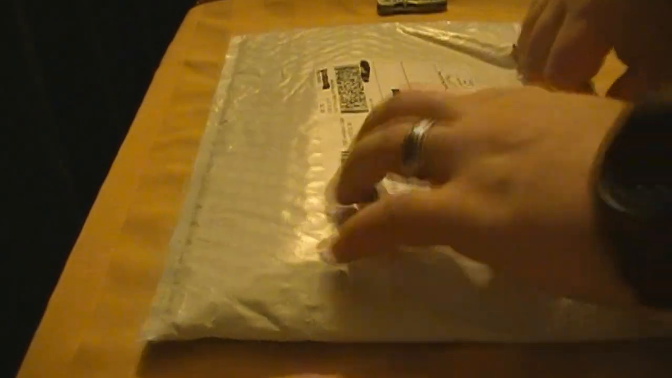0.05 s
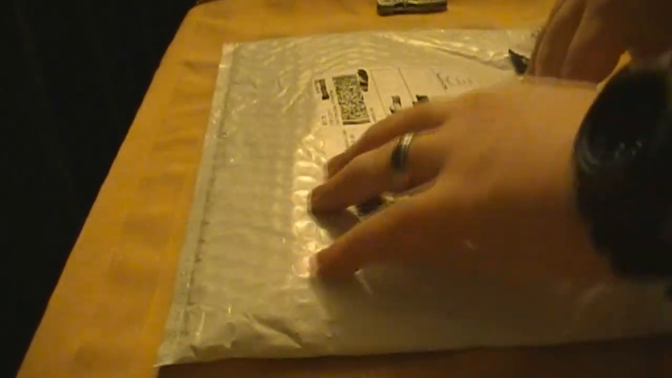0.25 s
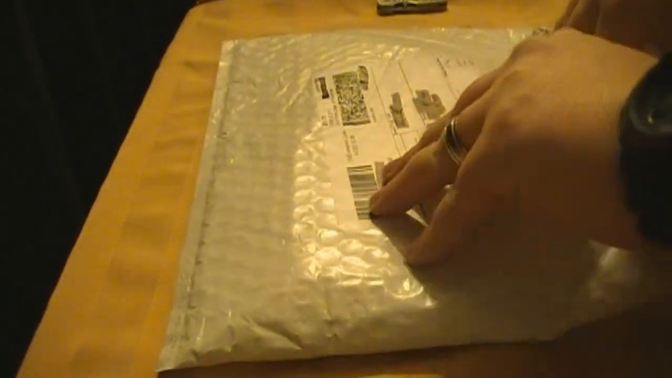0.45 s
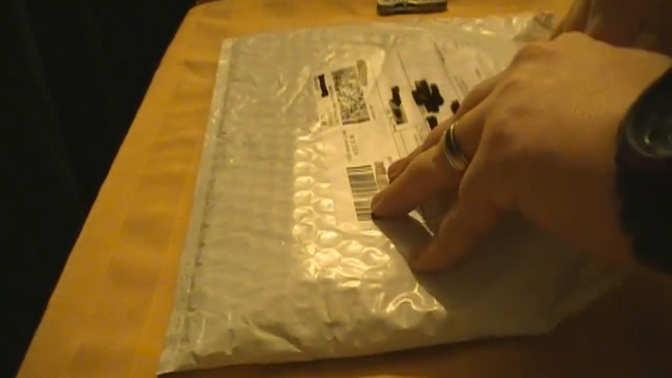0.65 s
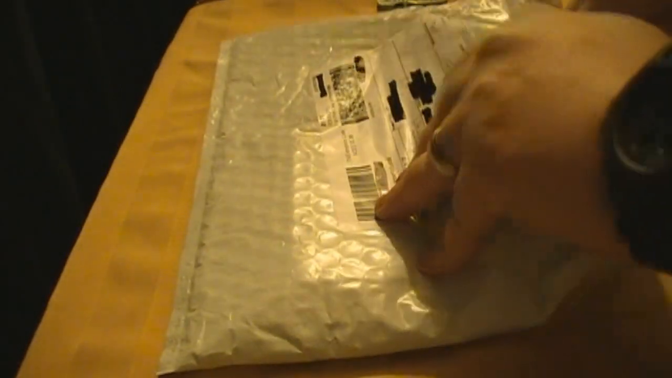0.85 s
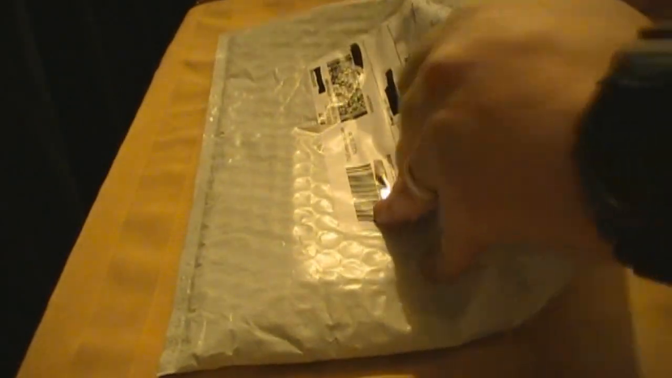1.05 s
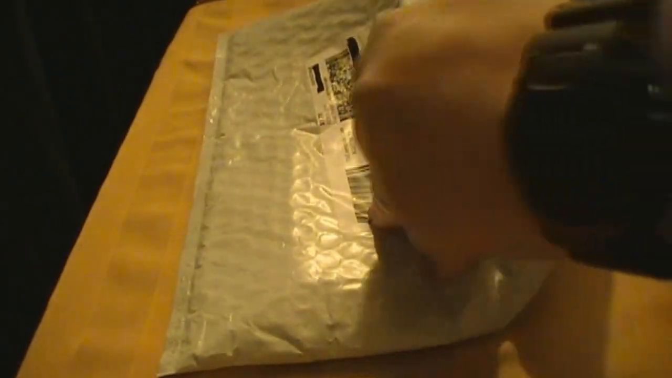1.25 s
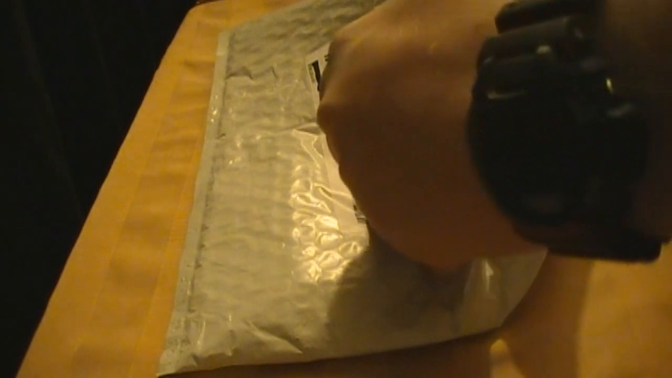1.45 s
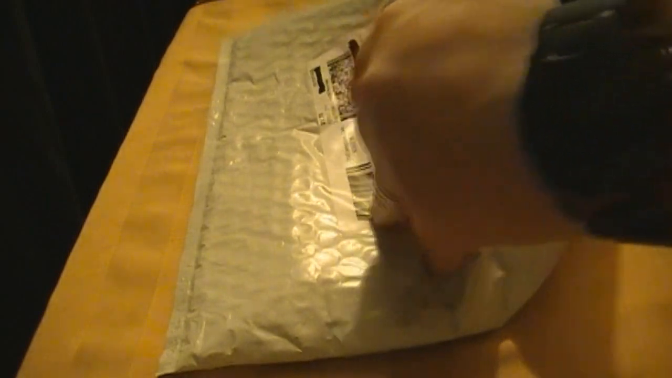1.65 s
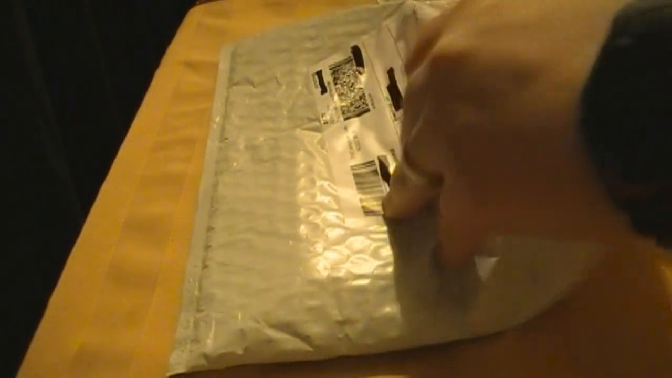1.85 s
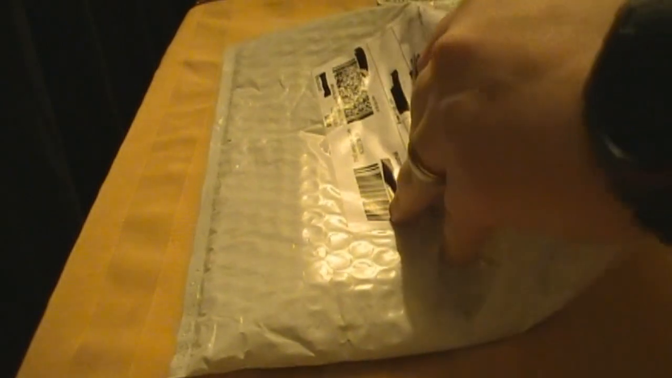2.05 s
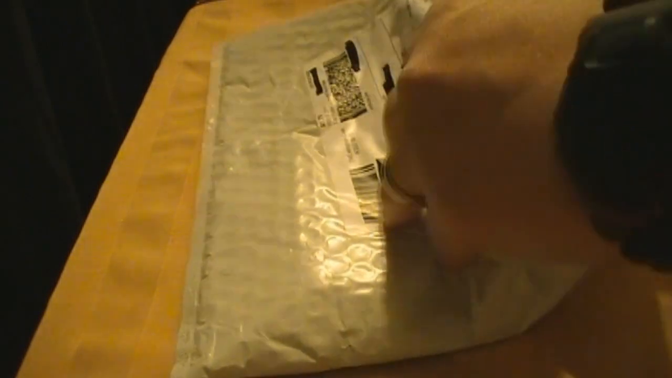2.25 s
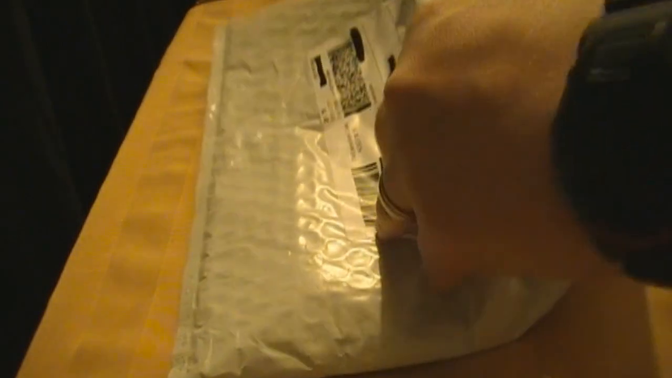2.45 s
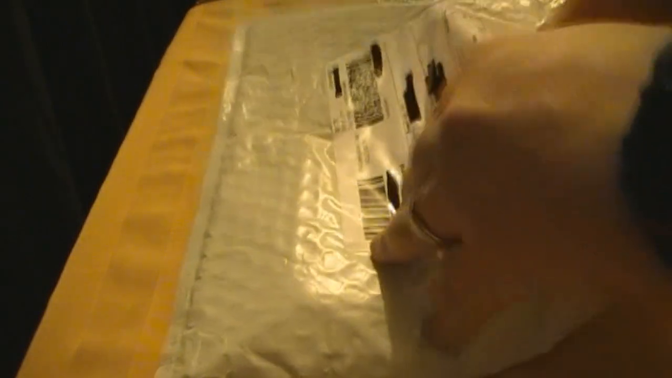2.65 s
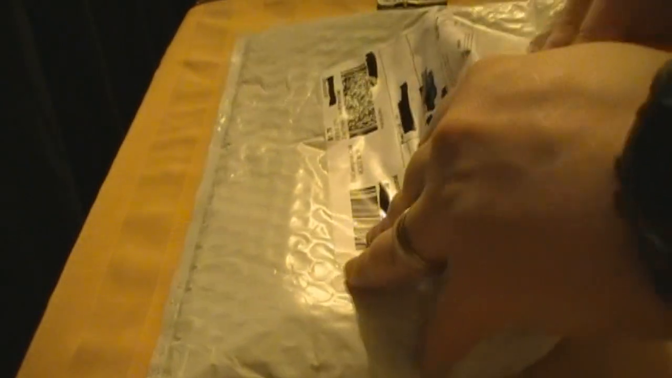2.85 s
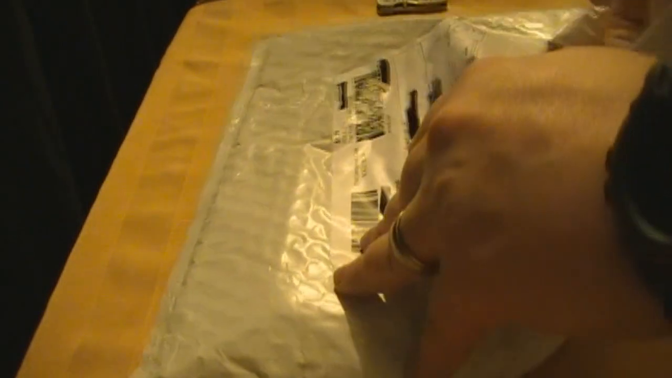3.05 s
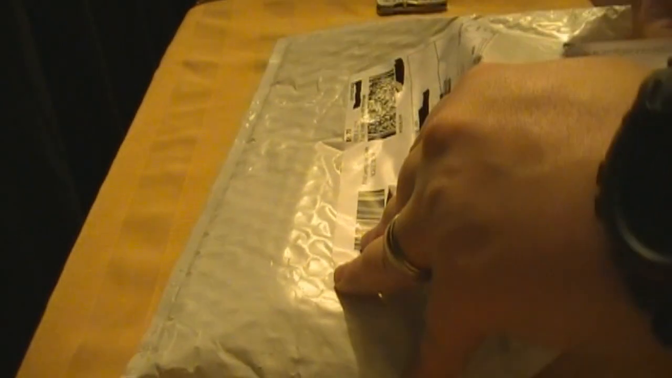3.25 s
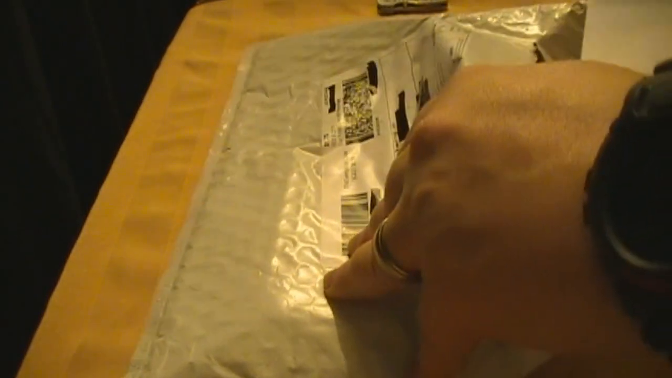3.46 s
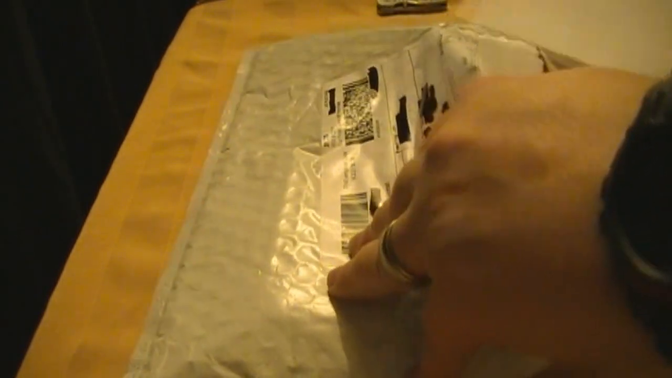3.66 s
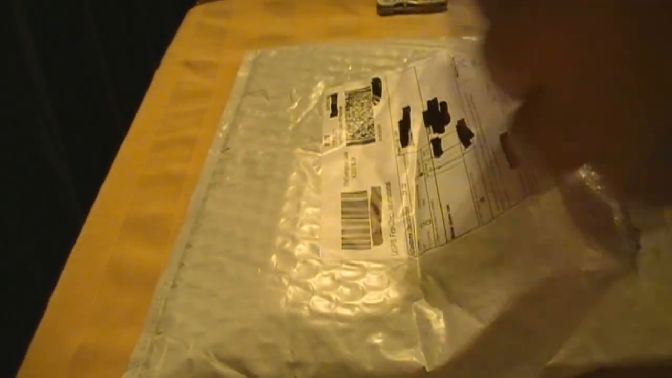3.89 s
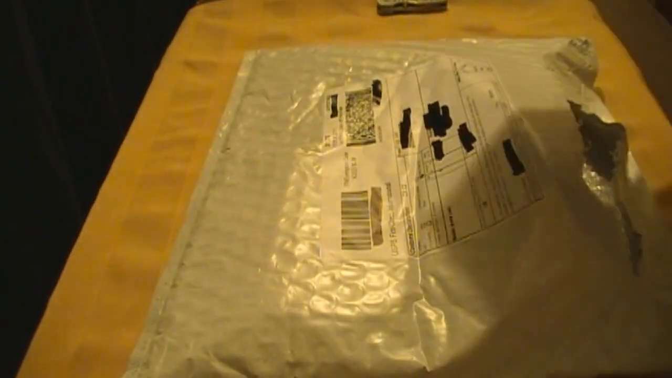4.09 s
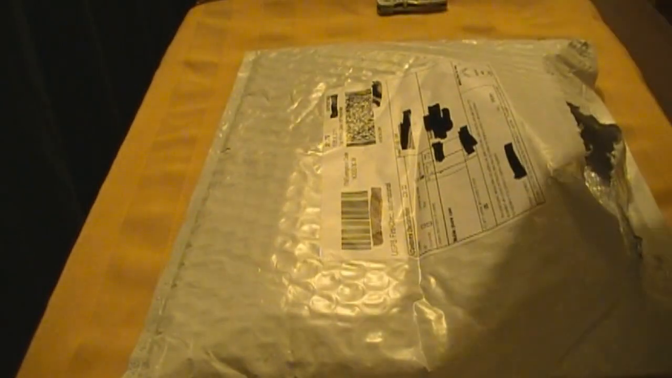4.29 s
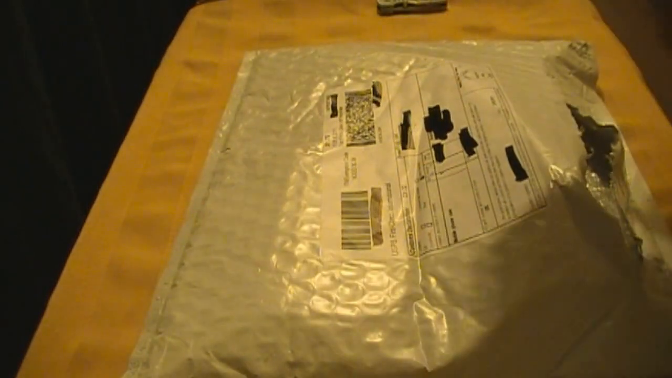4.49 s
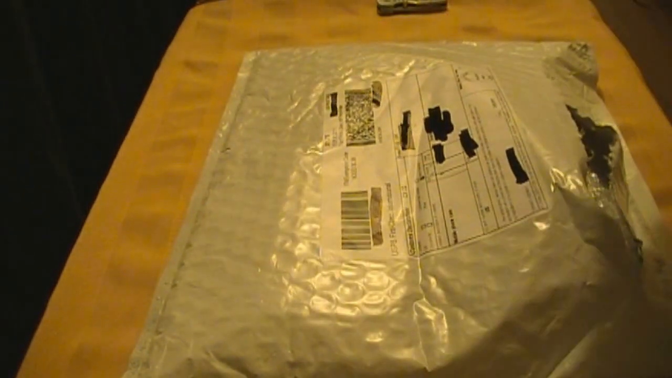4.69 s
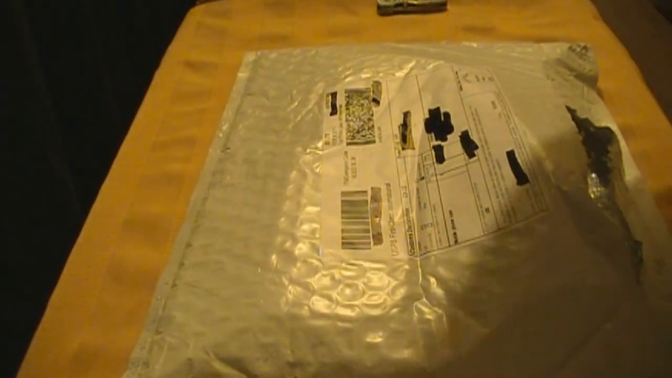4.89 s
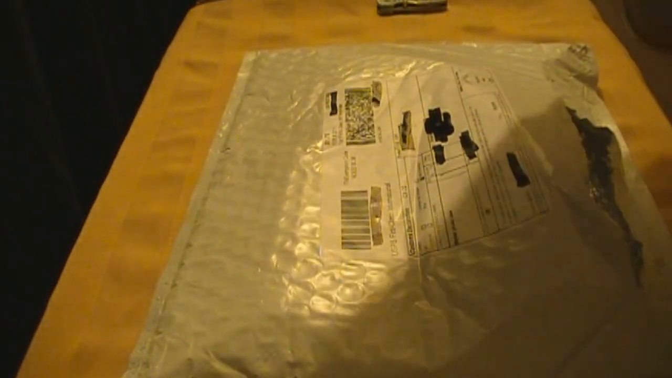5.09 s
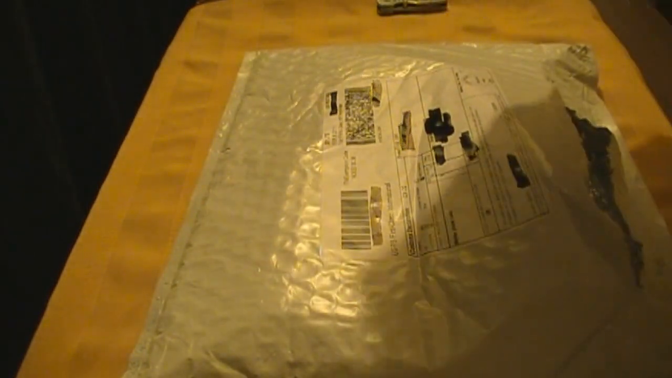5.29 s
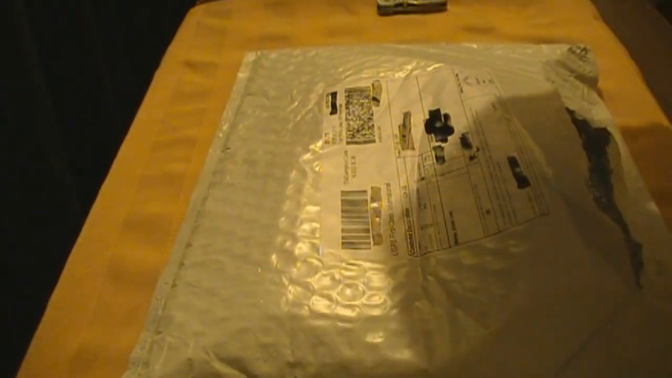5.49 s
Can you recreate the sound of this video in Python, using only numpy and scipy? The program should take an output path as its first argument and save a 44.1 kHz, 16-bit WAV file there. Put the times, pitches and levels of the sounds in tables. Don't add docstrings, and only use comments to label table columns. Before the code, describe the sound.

Close, bright crackle of a padded plastic envelope being torn and squeezed, with dull table thumps, then faint small ticks over hiss.

```python
import sys
import numpy as np
from scipy import signal
from scipy.fft import rfft, irfft, next_fast_len
from scipy.io import wavfile
from scipy.ndimage import uniform_filter1d

SR = 44100
rng = np.random.default_rng(int(sys.argv[2]) if len(sys.argv) > 2 else 0)


def level_to_linear(level):
    exponent = np.asarray(level, float) / 20
    return 10 ** exponent


def store_wav(level_fs):
    pcm = np.round(np.clip(np.atleast_2d(level_fs), -1, 1) * 32767)
    wavfile.write(sys.argv[1], SR, pcm.T.astype(np.int16))


N = 243991

# start in seconds, film crack energy in dB, padding knock energy in dB, panel pitch in Hz.
CREASES = [(.0348, -15, -38, 2230), (.0758, -40, -15.5, 1700), (.1041, -13, -14, 1310),
           (.1413, -5.5, -28, 1410), (.1563, -11, -29, 1810), (.2639, -31, -8, 2000),
           (.28, -12, -33, 1840), (.2958, -29, -11, 1340), (.3506, -11, -16, 2010),
           (.362, -6, -12.5, 1400), (.3789, -4, -16, 1920), (.3899, -11, -8, 1790),
           (.4127, -15, -7.5, 1340), (.4262, -23, -6.5, 2270), (.4433, -1, -2.5, 2120),
           (.4507, -2.5, -10, 1320), (.488, -29, -19, 1230), (.497, 2, -19, 1350), (.501, -35, -16, 930),
           (.5809, -31, -16.5, 1300), (.5914, -28, -12, 1920), (.6454, -6.5, -15.5, 1500),
           (.6634, -13, -41, 1800), (.672, -11, -45, 2130), (.6793, -25, -14.5, 1210),
           (.6929, -22, -15, 1420), (.7088, -7, -17, 1670), (.7316, 1, -14.5, 1860),
           (.7564, -22, -15, 2030), (.7853, -19, -23, 410),
           (0.7932, 1.5, -5.5, 1900), (0.8145, -13, -17, 2200), (0.8666, -11, -46, 2300),
           (0.9381, -16, -42.5, 970), (0.9436, -38, -10, 616), (0.977, -4, -24, 1990),
           (0.98, -28, -13.5, 1460), (1.0147, -21, -7, 1380), (1.0341, -9, -27, 750),
           (1.118, -6.5, -6.5, 402), (1.1443, -1.5, -23, 1500), (1.154, -9, -29, 1590),
           (1.1595, -18, -11, 2920), (1.203, 1, -11.5, 666), (1.298, -35, -32, 1750),
           (1.3101, -7.5, -21, 1820), (1.3184, -42, 2, 1470), (1.3256, 0.5, -43, 1710),
           (1.332, -8.5, -42, 2330), (1.425, -16, -13.5, 1780), (1.485, -9.5, -31, 1520),
           (1.5858, -7, -8, 1380), (1.6622, -34, -16.5, 720), (1.6792, -11, -9, 1940),
           (1.755, -11, -12.5, 1340), (1.7705, -10.5, -8.5, 2050), (1.8442, -38, -6, 2180),
           (1.8773, -9.5, -21, 710), (1.9319, -10.5, -43, 760), (2.055, -16, -6.5, 1880),
           (2.1664, -9, -4.5, 1800), (2.2561, -28, -9, 1020), (2.2631, -7.5, 0.5, 1590),
           (2.3414, -21, -3.5, 1560), (2.354, 0, -24, 1200), (2.4494, 1.5, 0, 664),
           (2.4786, -0.5, -6, 2340), (2.495, -3, -9, 1540), (2.518, -5, -7.5, 960), (2.5934, 0.5, 0.5, 655),
           (2.601, -12, -9, 1820), (2.6056, 3, -9.5, 990), (2.6242, 2.5, -1.5, 1400),
           (2.6697, -15, -8, 1402), (2.674, -1, -2.5, 1370), (2.7, -40, -8.5, 1390), (2.7985, 3, -3, 1390),
           (2.819, -17, -9, 1530), (2.908, -10.5, -21, 2180), (2.935, -17, -15, 1810),
           (2.981, -8, -12, 714), (2.986, -4, -5, 680), (3.008, -18, -6.5, 870), (3.0362, -12, -20, 790),
           (3.1223, -13, -7, 1580), (3.1990, 0, -4, 1470), (3.2053, 5, -4, 2010), (3.3178, -20, -12, 1580),
           (3.3446, -3.5, -6.5, 1220), (3.348, -4, -9, 398),
           (3.3578, -7, -3.5, 366), (3.37, -2, -2, 1730), (3.373, -6, -1, 3180), (3.379, -9, -1.5, 1940),
             (3.4621, 2, -1, 1920), (3.4703, -12, -13, 940), (3.688, -14, -6.5, 477),
             (3.6952, -2.5, -15, 740), (3.7077, -8, -23, 1310), (3.7272, -18, -13.5, 1840),
             (3.7513, -28, -9.5, 1230), (3.756, -16, -20, 1180), (3.7918, -6.5, -9.5, 1330),
             (3.889, -30, -13, 1260), (3.933, -4.5, -6.5, 2890), (3.993, -19, -24, 1290),
             (4.0711, -5.5, -5.5, 1890), (4.0825, -10, -6.5, 2480), (4.113, -10, -13, 536),
             (4.139, -1.5, 0, 1840), (4.1468, -24, -4, 1890), (4.2038, -17, -5, 2280),
             (4.263, -29, -8, 1720), (4.269, -9, -7.5, 1270), (4.274, -5.5, -2.5, 1760),
             (4.3284, 3.5, -8, 2290), (4.3352, 4, -7.5, 1260), (4.3415, -1, -0.5, 3100),
             (4.3571, -14, -3.5, 1850), (4.3628, -11, -6, 1260),
           (.31, -6.5, -30, 1010), (1.378, -34, -13, 980), (1.52, -22, -38, 1510), (1.6548, -25, -13.5, 440),
         (3.569, -33, -19, 710), (3.8005, -6.5, -41.5, 510), (3.816, -35, -12.5, 1280),
         (4.1302, -12, -7, 2600), (4.255, -35, -18, 1690), (4.374, -34, -9.5, 1920),
         (3.5345, -32, -43, 1500), (4.4208, -44, -22.5, 1930), (4.447, -20, -50, 1630),
         (4.493, -37, -21, 587), (4.5522, -14.5, -32, 3130), (4.713, -25.5, -18.5, 1310),
         (4.7397, -12, -22, 1240), (4.7467, -25, -14.5, 1240), (4.9033, -22, -28, 2100),
         (4.9568, -18.5, -34, 2070), (5.0718, -16.5, -26.5, 2090), (5.27, -24, -44, 363),
         (5.288, -19, -46, 650), (5.352, -30, -45, 1160), (5.454, -25, -25, 1480),
         (5.4886, -15.5, -23, 2070), (5.329, -25, -34, 1160), (2.0515, -4.5, -7, 1680),
         (3.458, -21, -9, 1800), (0.791, -2, -4.5, 3120), (4.5498, -18, -32, 3200),
         (1.0125, -15, -36, 1500)]
# low edge in Hz, high edge in Hz, first decay in ms (size only), debris decay in ms (at least 1),
# debris share (size only), level trim in dB.
CRACK = (5980, 10450, 0.34, 2.37, 0.11, 0.064)
KNOCK = (980, 4200, 1.7, 14, 0.23, 0.037)
THUMP = (270, 956, 0.97, 4.7, 1.44, 0.057)
RASP = (3289, 5321, -1, 3, 7, -5.5)
LEAK_DB, LEAK_DB_PER_OCTAVE = -10, -3


def snaps():
    creases = sorted(CREASES)
    s, crack_db, knock_db, panel_hz = np.transpose(creases)
    crack = snap_part(s, crack_db, CRACK)
    crack = crack + level_to_linear(-2.0) * band(crack, 9270, 16000)
    rasp = snap_part(s, 0.5 * (crack_db + knock_db), RASP)
    knock = snap_part(s, knock_db, KNOCK, panel_hz)
    leak_db = knock_db + LEAK_DB + LEAK_DB_PER_OCTAVE * np.log2(panel_hz / 1000)
    leak = snap_part(s, leak_db, THUMP, panel_hz)
    return level_to_linear(-1.5) * crack + rasp + knock + leak


PANEL_Q, PANEL_DB = 6, 11.5
RING_DB_PER_DB = 0.34
PADDED = 2.45
LEAD_MS, LEAD_SHARE, GIVE_MS = 7.9, 0.041, 0.28
CROWD_MS, CROWD_GAIN = 5.9, 0.91
CRUSH_S, CRUSH_HALF_S, CRUSH_GAIN = 4.2, 0.19, 2.7


def snap_part(s, energy_db, part, panel_hz=None, panel_db=PANEL_DB):
    low_hz, high_hz, first_ms, debris_ms, share, trim_db = part
    before = 400
    ms = np.arange(-before, 1400) * 1000 / SR
    chance = rng.standard_normal((len(s), 2, len(ms)))
    chance[:, 0, before] = 3.5 * np.sign(chance[:, 0, before])
    uneven = chance[:, 1] ** 2

    gaps_ms = 1000 * np.diff(s, prepend=-1, append=9)
    nearest_ms = np.minimum(gaps_ms[1:], gaps_ms[:-1])[:, None]
    crowd = 1 + CROWD_GAIN * np.exp(-(nearest_ms / CROWD_MS) ** 2)
    crowd = crowd + CRUSH_GAIN * (abs(s - CRUSH_S) < CRUSH_HALF_S)[:, None]

    debris = crowd * abs(share) * uneven * np.exp(-ms / np.clip(debris_ms, 1, 20))
    lead = np.sqrt(crowd) * LEAD_SHARE * uneven * np.exp(ms / LEAD_MS)
    if panel_hz is not None:
        lead = 2 * lead + np.exp(-abs(ms / GIVE_MS))
    shape = np.where(ms < 0, lead, np.exp(-abs(ms / first_ms)) + debris)
    bursts = band(chance[:, 0] * shape, low_hz, high_hz)
    bursts = band(bursts, 0.68 * low_hz, 4.4 * high_hz)
    if panel_hz is not None:
        bursts = panel_ring(bursts, ms, energy_db, panel_hz, panel_db)

    norm = np.sqrt(np.sum(bursts ** 2, axis=1, keepdims=True))
    bursts *= level_to_linear(energy_db + trim_db)[:, None] / norm
    out = np.zeros(N + len(ms))
    for at, burst in zip(np.round(s * SR).astype(int), bursts):
        out[at:at + len(ms)] += burst
    return out[before:N + before]


def panel_ring(bursts, ms, energy_db, panel_hz, panel_db):
    ratio = (np.arange(len(ms) // 2 + 1) + 0.01) * SR / len(ms) / panel_hz[:, None]
    lines = rfft(bursts)
    slip = uniform_filter1d(abs(lines), size=41) * rfft(ms == 0)
    ring_db = panel_db + RING_DB_PER_DB * np.minimum(energy_db, 0)
    resonance = level_to_linear(ring_db)[:, None] / (1 + 1j * PANEL_Q * (ratio - 1 / ratio))
    dulled = lines / (1 + (ratio / PADDED) ** 2)
    return irfft(dulled + slip * resonance, len(ms))


def band(x, low_hz, high_hz):
    edges_hz = [low_hz, min(high_hz, 0.45 * SR)]
    return signal.sosfilt(signal.butter(2, edges_hz, "band", fs=SR, output="sos"), x)


# start in seconds, tick energy in dB, tap energy in dB, panel pitch in Hz.
BUCKLES = [(0.0395, -10, -33, 2140), (0.094, -27, -16, 1590), (0.0973, -34.0, -16, 2280),
           (0.1118, -7, -23.5, 3060), (0.1684, -14, -38, 1250), (0.238, -29.5, -12, 726),
           (0.2805, -0.5, -9.5, 1800), (0.3617, -4, -8, 1370), (0.3845, -8, -6.5, 2000),
           (0.3935, -7, -10, 1220), (0.4476, -3.5, -11, 2340), (0.488, -14.5, -34, 1280),
           (0.498, -14, -6, 1410), (0.538, -18, -47.5, 1800), (0.5621, -15, -47.0, 1810),
           (0.5813, -7, -40, 2040), (0.5914, 2.5, -13.5, 1870), (0.6213, -23.0, -32, 720),
           (0.6795, -10, -20, 1250), (0.693, -4, -37, 1450), (0.7045, -39, -20, 2070),
           (0.7274, -9, -48, 990), (0.741, -40.5, -23.5, 2140), (0.7748, -13, -45, 1770),
           (0.8111, -17, -38.0, 1780), (0.8152, -1.5, -10, 2100), (0.854, -16.5, -25, 1970),
           (0.8602, -17, -18.5, 850), (0.8879, -15, -19, 800), (0.9412, -10, -19, 1250),
           (0.9661, -14, -48, 1950), (0.9775, 0.5, -14.5, 2040), (1.0338, -25, -16, 1990),
           (1.039, -35.5, -31, 850), (1.054, -16, -44.5, 560), (1.0757, -16, -45.5, 2150),
           (1.0822, -42.0, -20, 2600), (1.103, -19, -45.0, 3470),
           (1.1795, -23, -37.5, 640), (1.211, -14, -32.5, 1350), (1.259, -38.5, -10.5, 1270),
                  (1.3007, -10.5, -7.5, 1610), (1.3155, -40, -15, 517), (1.343, -4, -32, 1550),
                  (1.373, -16, -18.5, 1560), (1.4022, -18, -22, 2230), (1.4168, -17, -24, 1170),
                  (1.4398, -23, -36, 1840), (1.455, -13, -19, 1950), (1.4743, -20, -19, 1870),
                  (1.5194, -39.5, -24, 1000), (1.526, -13, -37, 1580), (1.5632, -21, -18, 1980),
                  (1.5949, -36.0, -18, 704), (1.6055, -25, -32.5, 2060), (1.6141, -21, -34, 720),
                  (1.6626, -25, -7.5, 2000), (1.6835, -12, -13, 860), (1.7446, -24, -17, 705),
                  (1.767, -24, -9.5, 1460), (1.7759, -18.5, -31, 510), (1.801, -44, -11, 806),
                  (1.937, -11.5, -25, 1530), (1.9406, -26.0, -15, 1960), (1.9605, -22, -33, 1380),
                  (2.073, -31, -11, 1850), (2.2593, -5.5, -22, 2000), (2.274, -15, -30, 1360),
                  (2.3006, -16, -18, 1490), (2.3157, -16, -38, 1420), (2.3258, -10, -34, 1160),
                  (2.3812, -48, -24, 1680), (2.4008, -13.5, -14, 506), (2.4188, -17, -13, 2710),
                  (2.4267, -42.5, -18, 1370), (2.457, -15.5, -23, 2110),
           (2.4611, -12, -30.5, 640), (2.5778, -21, -7.5, 3180), (2.6675, -7, -29, 1390),
                (2.7196, -28, -10, 804), (2.7419, -16, -20, 1120), (2.777, -42.0, -14, 1300),
                (2.806, 1, -32.0, 2090), (2.8384, -12, -14, 1840), (2.8676, -17, -33, 870),
                (2.9445, -38, -21, 1380), (3.1316, -11.5, -17, 1450), (3.4365, -22.5, -25, 1130),
                (3.4492, -46, -17, 2380), (3.5348, -14, -46, 2900), (3.6206, -42, -22, 1870),
                (3.6518, -18, -46.5, 1070), (3.7365, -32.0, -14, 990), (3.8516, -14, -18, 2870),
                (3.9421, -25, -33, 2730), (3.9511, -40, -12.5, 1260), (3.9972, -14, -20, 1220),
                (4.0049, -32, -45.5, 1250), (4.0286, -26, -22, 3500), (4.0636, -15, -19, 510),
                (4.1072, -38.5, -15, 1800), (4.581, -21, -38, 2000), (4.634, -38, -24.5, 1280),
                (4.73, -40, -22, 900), (4.7585, -20, -45.0, 1030), (4.7838, -22, -60, 1360),
                (4.829, -34, -27, 2100), (4.886, -18, -29, 3000), (5.133, -45, -32, 1110),
                (5.2422, -31, -50, 1500), (5.2833, -19.5, -37, 3500), (5.3658, -22.5, -55.0, 2560),
                (5.459, -33, -26.5, 900), (5.4928, -15.5, -37, 1910), (5.524, -26, -29, 1950)]
# low edge in Hz, high edge in Hz, first decay in ms (size only), debris decay in ms (at least 1),
# debris share (size only), level trim in dB.
TICK = (8900, 12100, 0.36, 0.73, 0.12, 0.1)
TAP = (616, 3370, 0.83, 6.9, 0.082, 0.1)
SCRATCH = (3399, 6000, -1.1, -5.5, -4, -8)


def buckles():
    s, tick_db, tap_db, panel_hz = np.transpose(BUCKLES)
    tick = snap_part(s, tick_db, TICK)
    tap = snap_part(s, tap_db, TAP, panel_hz)
    scratch = snap_part(s, 0.5 * (tick_db + tap_db), SCRATCH)
    return tick + tap + scratch


# start in seconds, thump energy in dB, panel pitch in Hz.
BUMPS = [(0.282, -23, 700), (0.394, -24, 900), (.501, -17, 900), (0.7898, -8.5, 357), (0.9451, -16, 593),
         (1.0156, -7, 710), (1.1168, -3.5, 420), (1.2591, -11, 770), (1.3099, -7, 745), (1.6623, -10, 720),
         (1.771, -11, 704), (1.8448, -12.5, 810), (2.0549, -15.5, 744), (2.1676, -30, 694),
         (2.4482, -12, 670), (2.5946, -15, 650), (2.6228, -0.5, 544), (2.7201, -16, 760),
         (2.7984, -21, 890), (3.0357, -11.5, 796), (3.12, -15.5, 710), (3.3486, 2, 380), (3.3732, -9, 744),
         (3.6875, -10.5, 368), (3.7508, -15, 640), (4.0648, -4.5, 444), (4.108, -8.5, 405),
         (4.147, -8.5, 696), (4.3621, -11.5, 760), (4.9814, -20.5, 327)]
# low edge in Hz, high edge in Hz, first decay in ms (size only),
# debris decay in ms (at least 1), debris share (size only), level trim in dB.
RUMBLE = (99, 260, 13, -8, -6, -22)


def bumps():
    s, thump_db, panel_hz = np.transpose(BUMPS)
    return snap_part(s, thump_db, THUMP, panel_hz, panel_db=12) + snap_part(s, thump_db, RUMBLE)


# time in seconds, level in dB.
WEIGHT = [(0, -46), (.31, -44.5), (.58, -50), (.83, -56.5), (1.19, -44), (1.29, -48.5), (1.43, -54),
          (1.99, -43.5), (2.26, -45.5), (2.63, -48), (2.79, -48), (3.3, -45), (3.51, -51), (4.02, -62.5),
          (4.08, -41.5), (4.38, -47.5), (4.45, -55), (5.25, -70.5)]
# time in seconds, share from 0 to 1.
SLIDING = [
    (0, 0.52),
    (1.5, 0),
    (2.0, 0.55),
    (2.9, 0.8),
    (3.6, 0.25),
    (5.53, 1),
]
REST_DB = -8.5


def crinkle():
    padding_db, = in_time(WEIGHT)
    film_db = np.maximum(stroke_db(), padding_db + REST_DB)
    swell_db = 0.65 * (film_db - uniform_filter1d(film_db, size=SR // 4))
    sliding = np.clip(in_time(SLIDING)[0], 0, 1)
    pull = 2.0 * drift(16.0) + 2.5 * drift(60.0)

    grit = grains(4500, 13700, 3000, spread_db=5.0, cycles=9.0, clumps=pull + 1.7 * drift(25.0))
    slide = through_bag(band(rng.standard_normal(N), 3600, 16000)) * level_to_linear(0.4 * pull)
    film = level_to_linear(film_db) * (np.sqrt(1 - sliding) * grit + np.sqrt(sliding) * slide)

    rub = grains(915, 4000, 1100, spread_db=2.0, cycles=5.7, clumps=pull + 1.8 * drift(24.0))
    padding = level_to_linear(padding_db + swell_db) * rub
    creak = grains(274, 870, 900, spread_db=3.5, cycles=3.0, clumps=pull + 1.8 * drift(14.0))
    table = table_gain(padding_db) * level_to_linear(swell_db) * creak
    return film + padding + table


def grains(low_hz, high_hz, per_s, spread_db, cycles, clumps):
    sizes = level_to_linear(spread_db * np.minimum(rng.exponential(1, N), 4.2)) * rng.choice([-1, 1], N)
    born = rng.random(N) < per_s * level_to_linear(clumps) / SR
    patches = 12
    dealt = rng.integers(0, patches, N)
    out = 0
    for k, hz in enumerate(np.geomspace(low_hz, high_hz, patches)):
        r = level_to_linear(-60 * hz / (cycles * SR))
        w = 2 * np.pi * hz / SR
        hits = sizes * born * (dealt == k) + 1e-18
        out = out + signal.lfilter([1 - r, 0, r - 1], [1, -2 * r * np.cos(w), r * r], hits)
    return through_bag(out)


# start in seconds, hold in seconds, level in dB.
STROKES = [(0, 0.13, -37.5), (0.259, 0.035, -33.5), (0.352, 0.1, -34.5), (0.565, .01, -51),
           (0.68, 0.018, -40.5), (0.793, 0.009, -39.5), (0.884, 0.17, -43.5), (1.145, 0.074, -38.5),
           (1.295, 0.011, -35.5), (1.42, 0.013, -35.5), (1.594, 0.18, -41), (1.861, 0.33, -40.5),
           (2.255, 0.2, -46.5), (2.559, 0.044, -33.5), (2.794, 0.018, -38.5), (2.98, 0.09, -38.5),
           (3.19, 0.033, -37), (3.344, 0.017, -35), (3.589, .04, -47), (3.718, 0.028, -35),
           (3.826, 0.34, -44), (4.102, 0.11, -40.5), (4.28, .01, -46.5), (4.318, 0.0029, -33.5),
           (4.465, 0.17, -47.5), (4.727, 0.017, -49.5), (4.835, 0.092, -46.5), (5.016, .14, -52.5),
           (5.29, 0.009, -54), (5.492, .05, -56.5)]
RISE_DB_PER_S, FALL_DB_PER_S = 209, 149


def stroke_db():
    t = np.arange(N) / SR
    levels = []
    for s, hold, db in STROKES:
        rise = RISE_DB_PER_S * np.maximum(s - t, 0)
        fall = FALL_DB_PER_S * np.maximum(t - s - hold, 0)
        levels.append(db - rise - fall)
    return np.max(levels, axis=0)


TABLE_DB, TABLE_LATE_DB, PRESSED_S = -5, -34, 0.86
GRUMBLE_DB, GRUMBLE_S = -52.5, 0.072


def table_gain(padding_db):
    t = np.arange(N) / SR
    grumble = sum(level_to_linear(db + GRUMBLE_DB) * np.exp(-abs(t - s) / GRUMBLE_S) * (t > s) for s, db, _ in BUMPS)
    lifted = np.clip(1 - t / PRESSED_S, 0, 1)
    return level_to_linear(padding_db + TABLE_DB + TABLE_LATE_DB * lifted) + grumble


# frequency in Hz, density in dB per Hz.
BAG = [(88, -22), (150, 9), (238, -5), (324, 4.5), (728, 3.5), (1050, -2), (1510, 1), (5000, -11.5),
       (7400, -9.5), (10000, -4), (12400, -8), (15000, -17.5)]


def through_bag(x):
    return rms_one(coloured(x, BAG))


def coloured(x, spectrum):
    size = next_fast_len(x.shape[-1])
    hz, level_db = np.transpose(spectrum)
    grid = np.maximum(np.arange(size // 2 + 1) * SR / size, 1)
    gain = level_to_linear(np.interp(np.log(grid), np.log(hz), level_db))
    return irfft(rfft(x, size) * gain, size)[..., :x.shape[-1]]


def rms_one(x):
    return x / np.sqrt(np.mean(x ** 2) + 1e-20)


def in_time(rows):
    s, *columns = np.transpose(rows)
    return [np.interp(np.arange(N) / SR, s, c) for c in columns]


def drift(rate_hz):
    r = np.exp(-2 * np.pi * rate_hz / SR)
    wander = signal.lfilter([1], [1, -2 * r, r * r], rng.standard_normal(N + SR))
    return rms_one(wander[SR:])


ROOM_T60_S, ROOM_DB, ROOM_CUT_HZ = 0.16, -18, 7200


def room(x):
    s = np.arange(SR // 2) / SR
    tail = rng.standard_normal(len(s)) * level_to_linear(-60 * s / ROOM_T60_S) * (s > 0.004)
    tail = band(tail, 96, ROOM_CUT_HZ)
    return level_to_linear(ROOM_DB) * signal.fftconvolve(x, tail / np.sqrt(np.sum(tail ** 2)))[:N]


# frequency in Hz, density in dB
# per Hz.
HISS = [(30, -18), (90, -5.5), (200, -4), (1200, -9.5), (1650, -11.5), (2100, -3), (2900, -15.5),
        (9890, -17), (12200, -15), (15000, -41.5)]
HISS_DB = -58.5
HUM_HZ, HUM_DB = 120.0, -70.5


def background():
    hum = np.sqrt(2) * np.sin(2 * np.pi * HUM_HZ * np.arange(N) / SR)
    hum = hum * level_to_linear(HUM_DB + 1.0 * drift(0.78))
    hiss = level_to_linear(HISS_DB) * rms_one(coloured(rng.standard_normal(N), HISS))
    return hiss + hum


def scene():
    bag = snaps() + bumps() + crinkle() + buckles()
    return (bag + room(bag) + background())[None]


def band_limit(x):
    return signal.sosfilt(signal.butter(12, 16460, fs=SR, output="sos"), x)


def record(dry):
    mix = 0.84 * np.tanh(dry / 0.96)
    return band_limit(mix)


dry = scene()
out = record(dry)
store_wav(out)
```